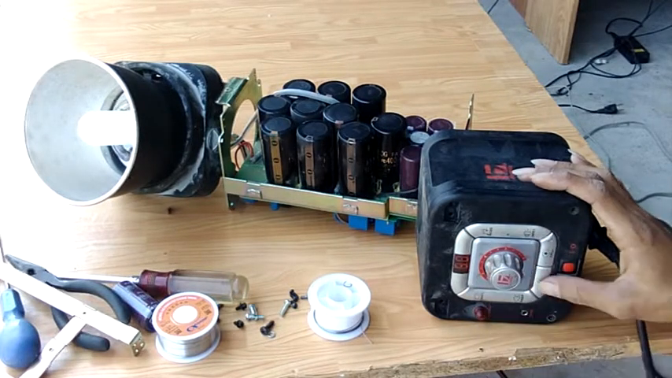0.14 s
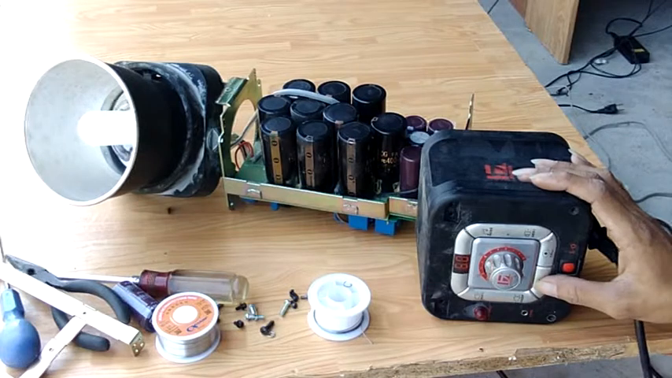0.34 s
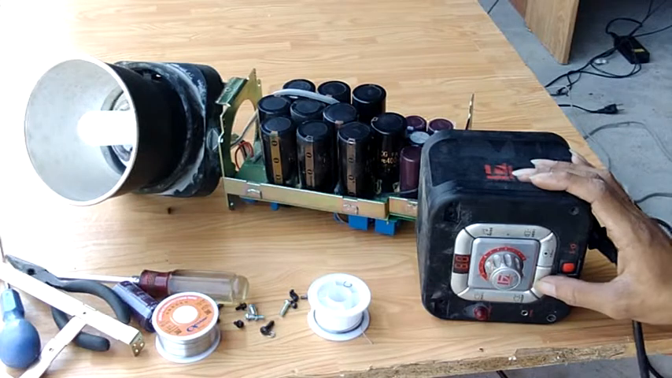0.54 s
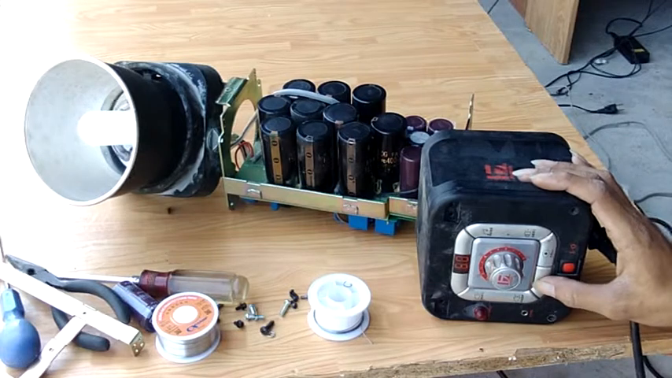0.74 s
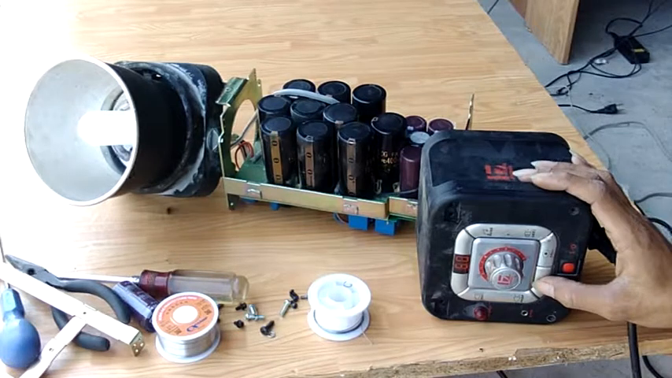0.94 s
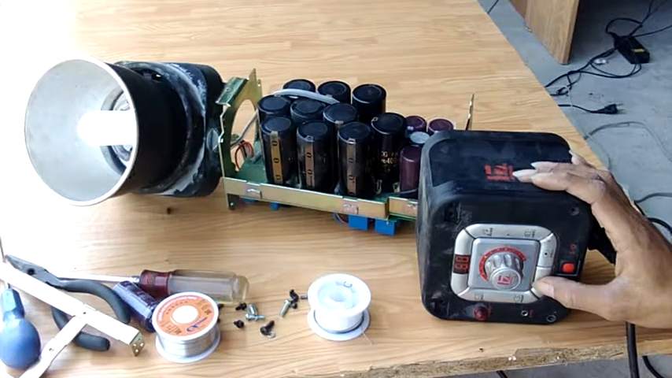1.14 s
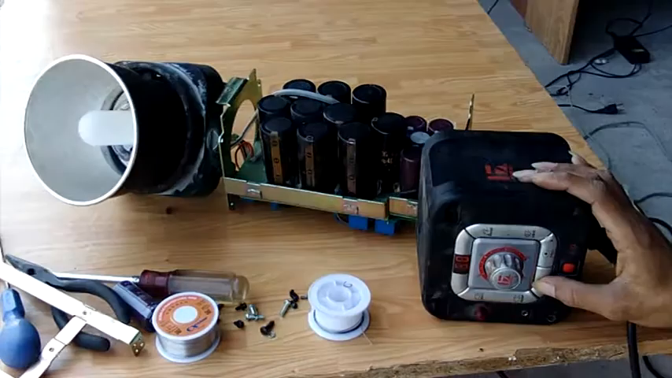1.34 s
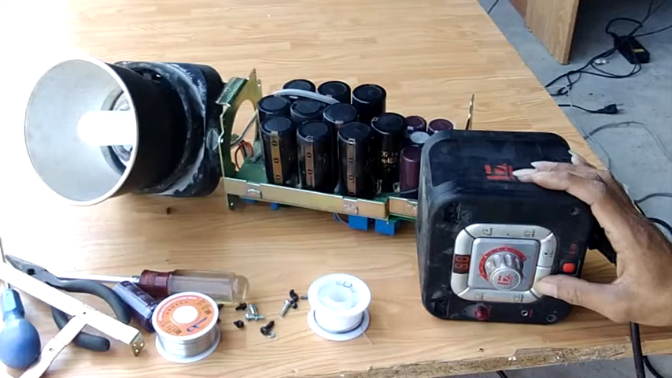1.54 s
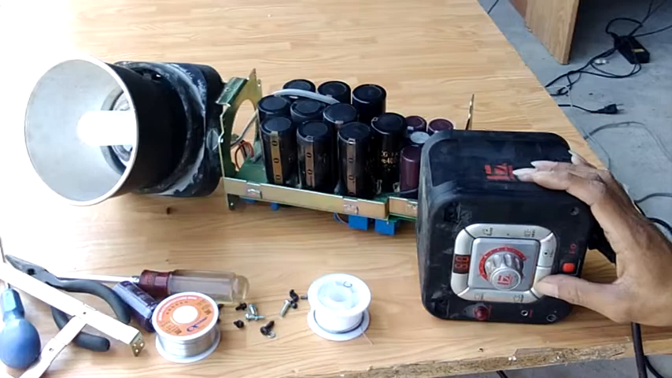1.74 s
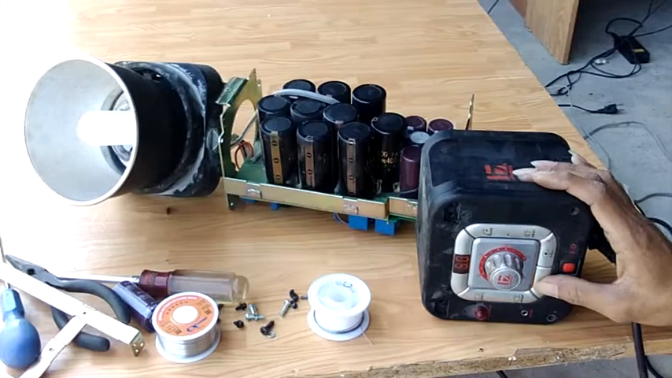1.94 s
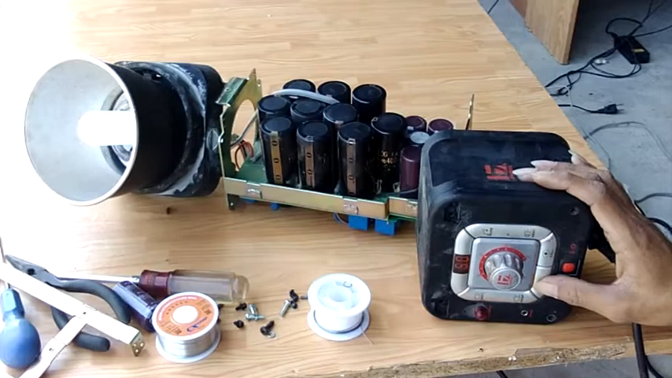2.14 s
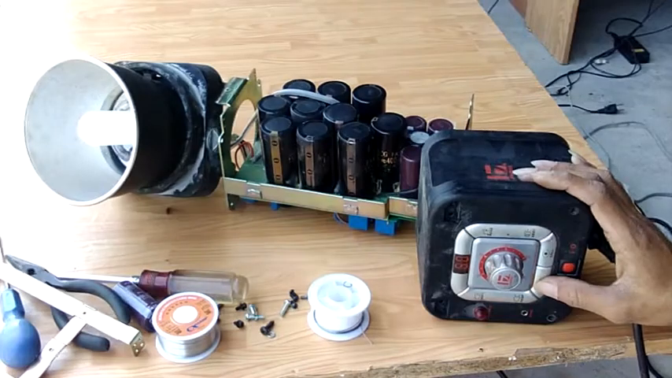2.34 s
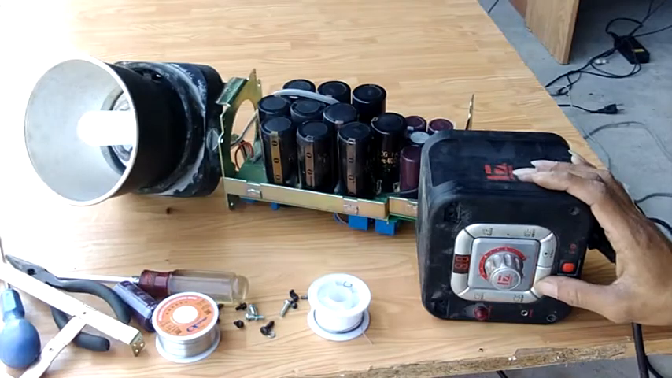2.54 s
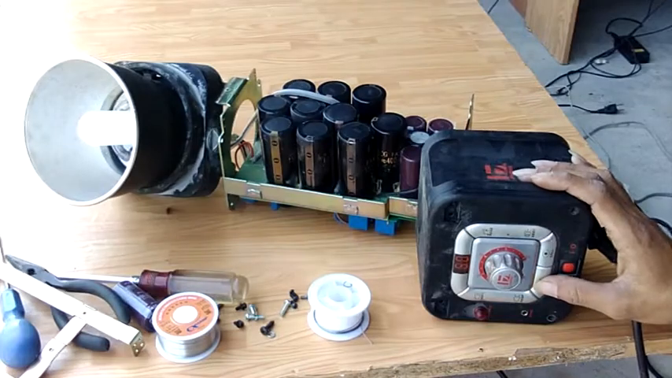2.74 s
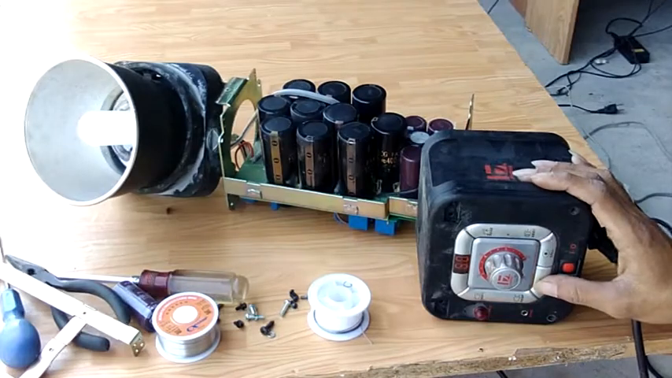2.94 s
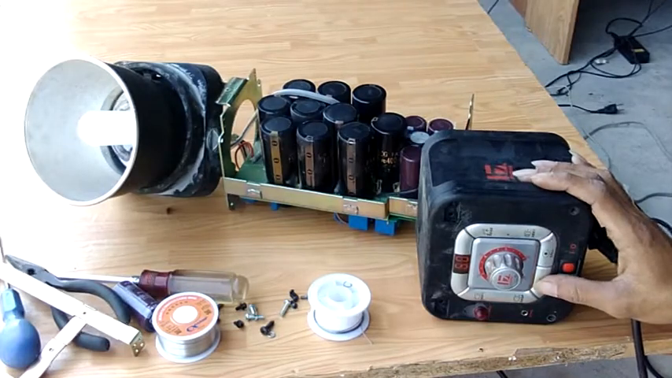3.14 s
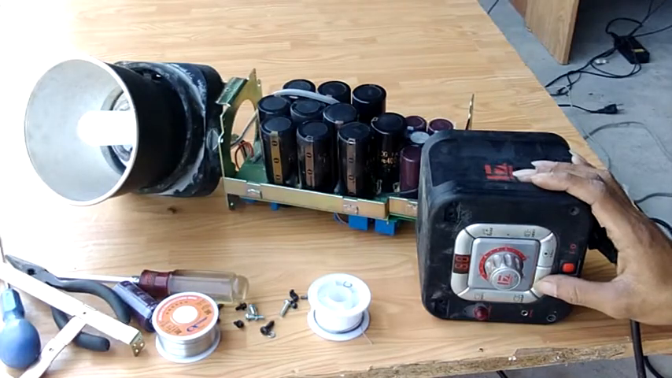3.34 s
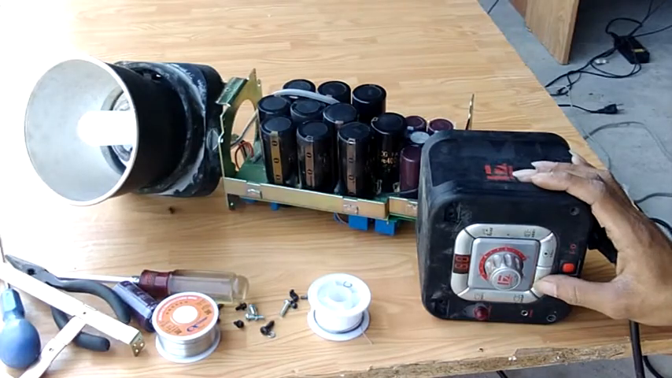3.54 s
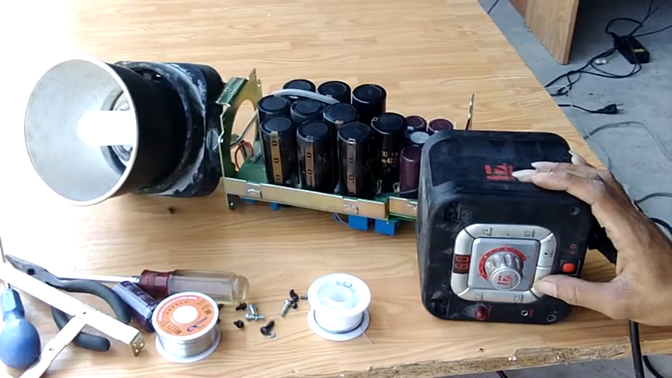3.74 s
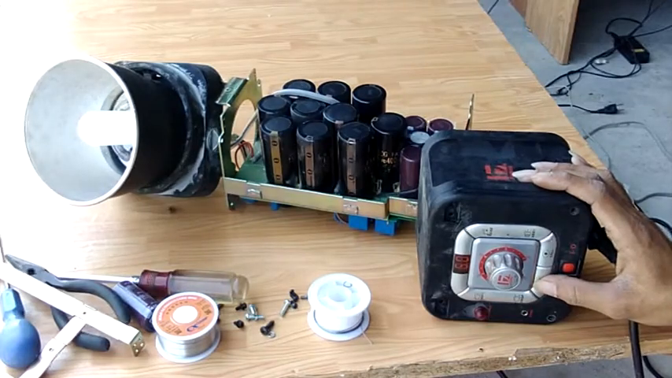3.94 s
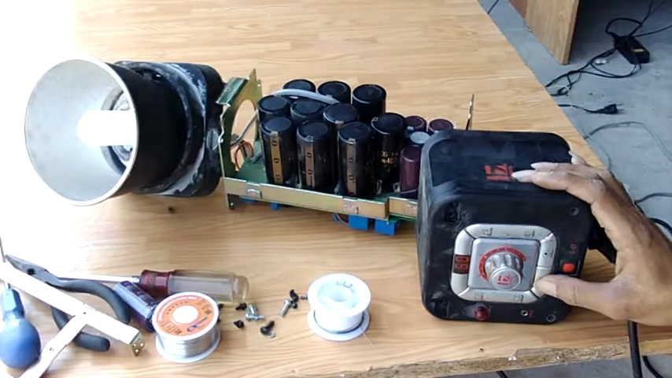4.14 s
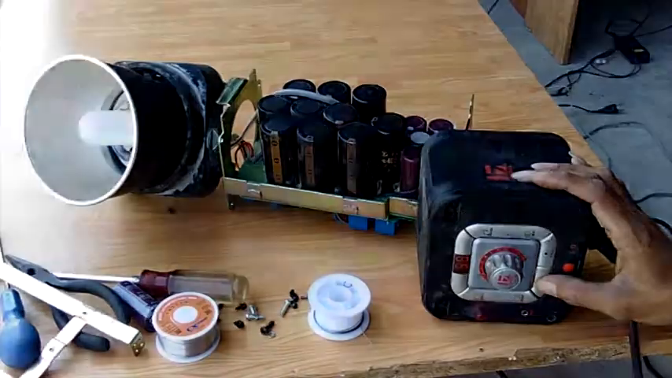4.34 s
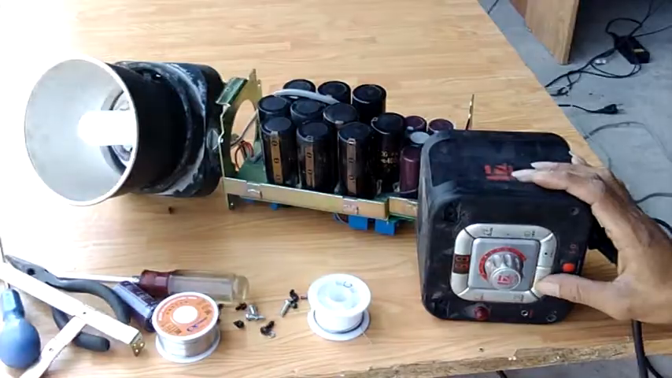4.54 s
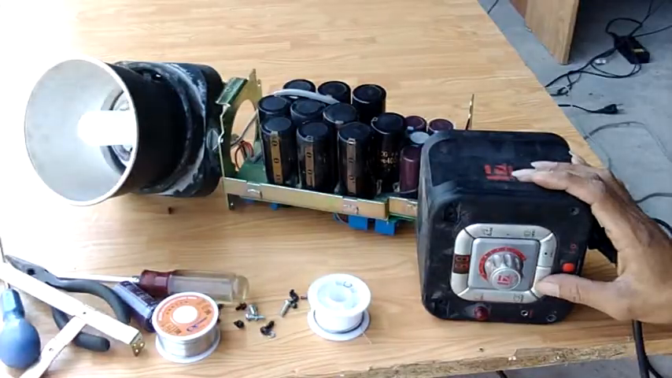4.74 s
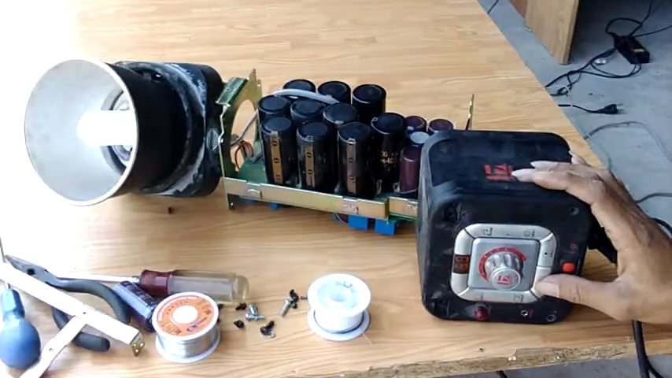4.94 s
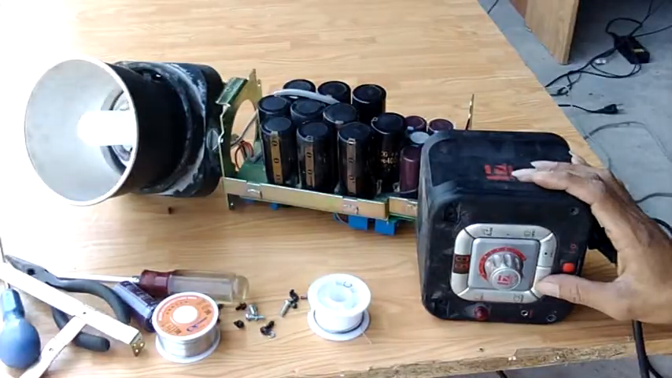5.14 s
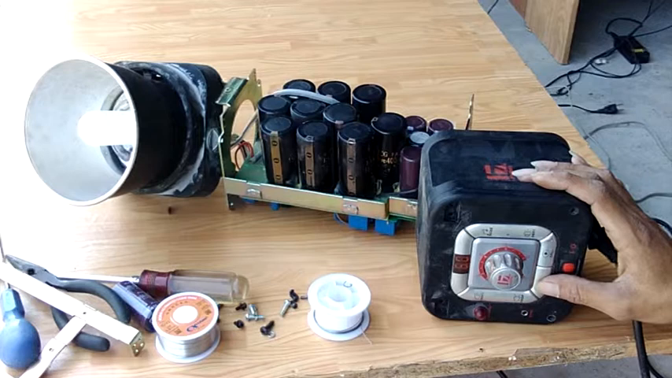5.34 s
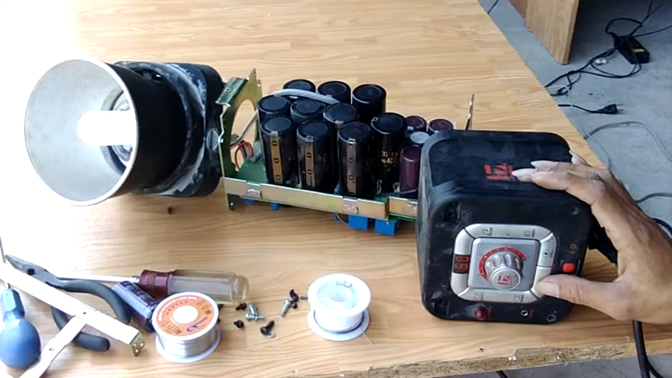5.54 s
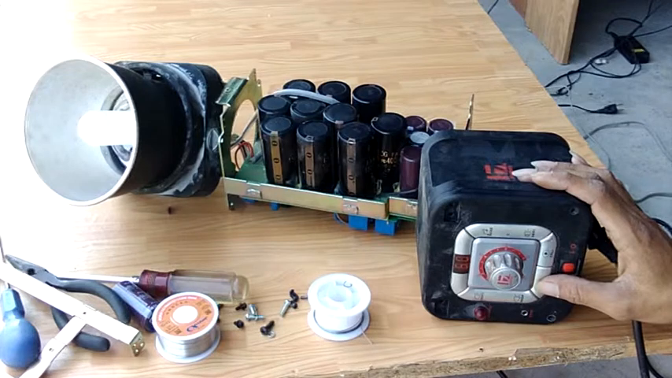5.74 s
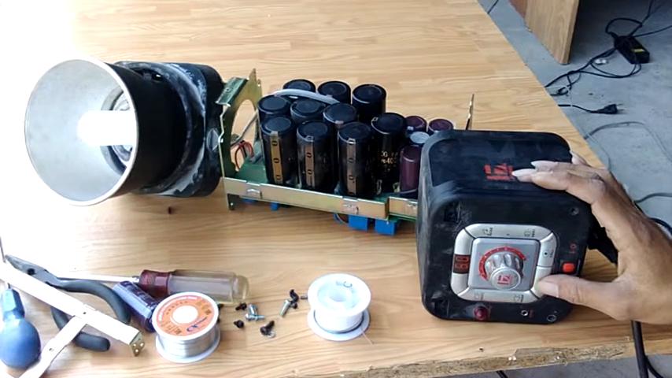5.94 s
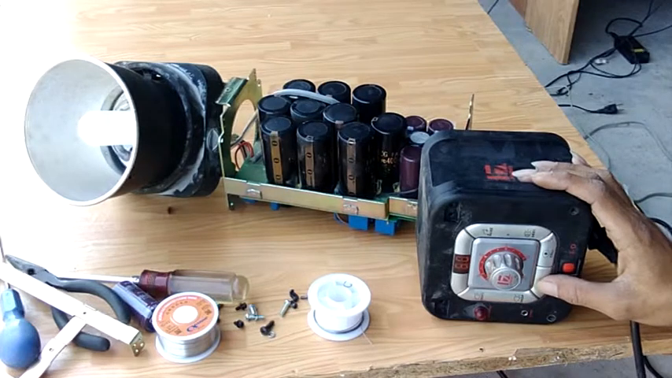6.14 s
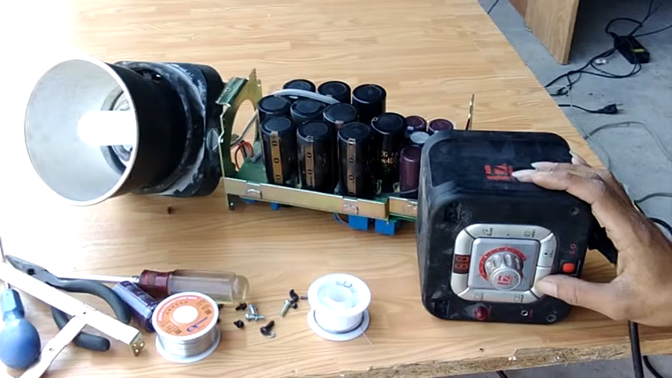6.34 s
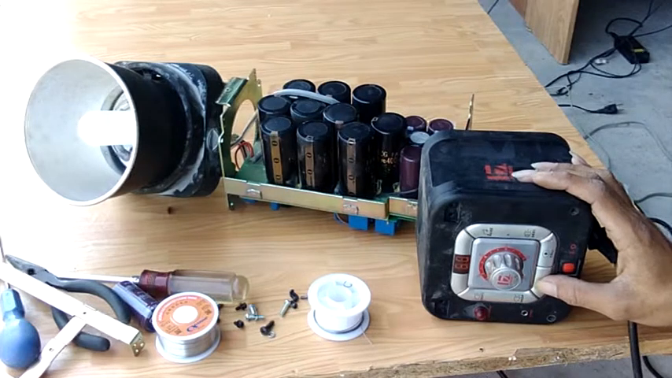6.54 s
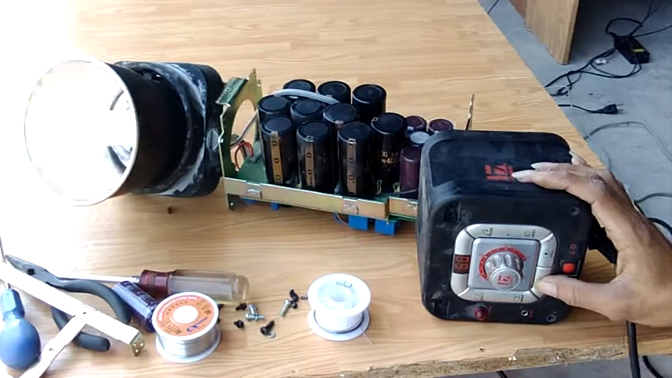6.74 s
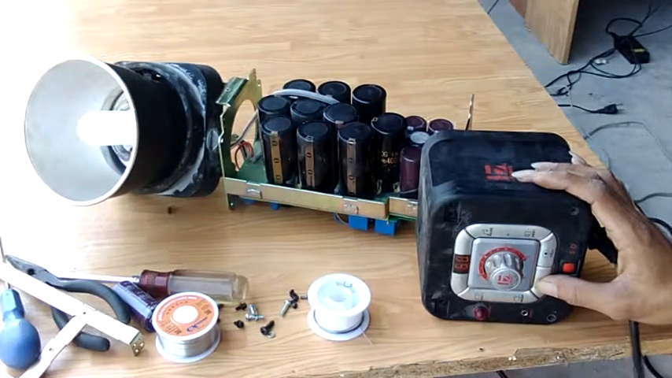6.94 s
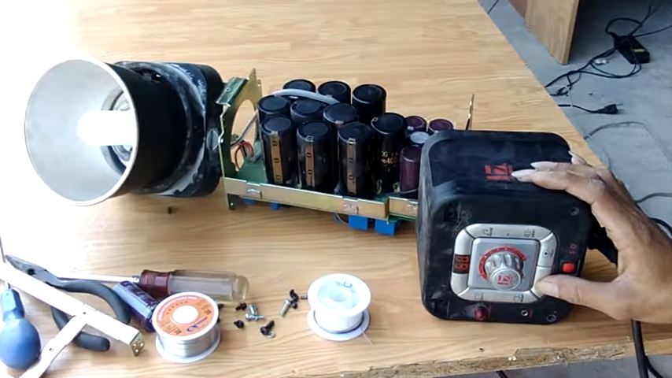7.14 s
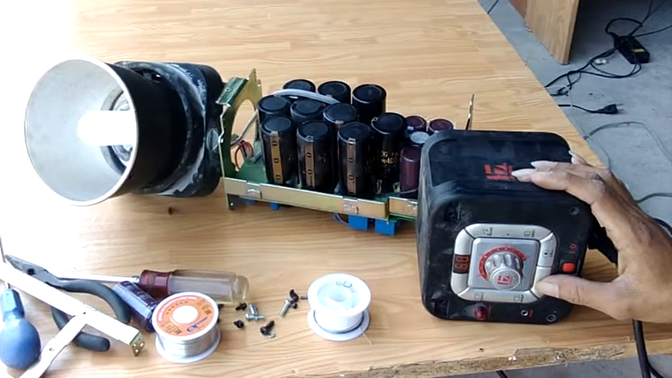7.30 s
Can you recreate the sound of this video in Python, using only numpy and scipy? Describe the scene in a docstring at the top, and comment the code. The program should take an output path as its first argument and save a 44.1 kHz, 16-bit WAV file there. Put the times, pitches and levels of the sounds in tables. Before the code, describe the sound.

Close stereo phone pickup in a bare, live workshop. Over a faint airy drone and distant small birds, a studio flash fires three times, each an abrupt loud pop with metallic reflector ring and short room tail. A plastic button clicks back shortly after each one. Soft bumps and rubs come between the first two pops; a scuff follows the second.

```python
"""An airy drone with faint rustles and small birds outside comes first; soft handling bumps and rubs follow.
A studio flash is test-fired three times on a wooden repair bench, less than a metre from a phone.
Each discharge is one pressure pulse that rings the reflector and the bare workshop; the test button
springs back after it. A thin whine sets in after the second pop, and one scuff follows it.
Noise is filtered for air and friction, damped sines make the knocks, and gliding sines make the birds."""
import sys
import numpy as np
from scipy import signal
from scipy.fft import rfft, irfft
from scipy.io import wavfile
from scipy.ndimage import uniform_filter1d

SR = 44100
rng = np.random.default_rng(int(sys.argv[2]) if len(sys.argv) > 2 else 0)


def unload_wav(signal):
    """Save mono or channel-first audio to the path in sys.argv[1] as 16-bit WAV at rate SR, clipped to [-1, 1]."""
    wavfile.write(
        sys.argv[1],
        SR,
        np.round(np.clip(np.atleast_2d(signal).T, -1, 1) * 32767).astype(np.int16),
    )


N = 329427
TIME = np.arange(N) / SR  # s
FREQ = np.arange(N + 1) * SR / (2 * N)  # Hz, bins of a transform of length 2 N

# broad spectrum of the drone's air noise: frequency_hz, left_db, right_db
AIR_SPECTRUM = [(25.8, -60, -76.5), (54, -38, -39), (86.6, -38, -36.5), (200, -57, -57), (500, -64, -59),
                (712.5, -44, -41.5), (920, -66, -67.5), (1220, -72.5, -68.5), (1466, -52.5, -64.5),
                (1745, -67, -71.5), (1870, -73, -77.5), (2960, -77.5, -81), (9300, -88, -87.5),
                (14000, -86.5, -84)]
# narrow resonances that colour the drone: frequency_hz, width_hz, left_boost_db, right_boost_db
DRONE_RESONANCES = [(430, 70, 6, 2), (650, 39, 7, 2.5), (987, 120, 14, 2), (1310, 50, 0, 8),
                    (1650, 53, -7, 1), (1835, 34, 14, -4.5), (2020, 47, 7, -3.5), (2352, 89, 21.5, -5.5),
                    (2650, 34, 18, 9.5)]

# soft rasping rubs while the hand shifts: peak_s, level_db
RUBS = [(2.61, -61), (3.04, -62.5), (3.509, -61), (4.07, -63.5), (4.55, -73.5), (7.118, -65.5)]
# spectrum of the rubs: frequency_hz, level_db
RUB_SPECTRUM = [(170, -1.5), (350, 7), (650, 9.5), (1100, 1), (1900, -5), (2650, 10), (3300, -21),
                (6000, -17), (12000, -40.5)]
# spectrum of the scuff: frequency_hz, left_db, right_db
SCUFF_SPECTRUM = [(151, -55.5, -52), (353, -45.5, -40.5), (686, -39.5, -40.5), (1270, -47, -46.5),
                  (2470, -50, -57), (3270, -67.5, -69), (7050, -68.5, -79), (11450, -90, -61.5),
                  (14500, -79, -73)]
RUB_RISE_DB_PER_S, RUB_FALL_DB_PER_S = 53, 49.5
SCUFF_START_S, SCUFF_ATTACK_S, SCUFF_HOLD_S, SCUFF_FALL_DB_PER_S = 5.465, 0.064, 0.045, 99

# the charging circuit starts louder by the extra and settles
WHINE_HZ, WHINE_START_S, WHINE_DB, WHINE_EXTRA_DB, WHINE_SETTLE_S = 14002, 4.78, -93.5, 11.5, 0.5

# a small bird's quick double chips: start_s, top_pitch_hz, level_db
BIRD_CHIPS = [(.145, 6550, -74), (.186, 7240, -69), (.62, 7030, -74.5), (.686, 6520, -65),
              (1.538, 6830, -69), (2.511, 6830, -64), (2.972, 6730, -62), (4.61, 6600, -70.5),
              (5.005, 6500, -68), (5.412, 7070, -73), (5.478, 6940, -64.5), (5.87, 6930, -66),
              (6.262, 7510, -70), (6.328, 7000, -68), (6.775, 7420, -55), (6.845, 6870, -52),
              (7.403, 6880, -60)]
# length, one arch of pitch, share by which the pitch dips between arches
CHIP_S, CHIP_ARCH_S, CHIP_DIP = 0.023, 0.01, 0.11
# its falling whistles: start_s, start_pitch_hz, level_db
BIRD_SLURS = [(1.94, 5400, -71.5), (1.97, 4730, -72.5), (2.27, 4900, -79.5), (3.01, 6800, -70),
              (3.46, 7250, -76.5), (3.76, 6900, -76), (3.955, 6880, -67), (4.015, 6480, -62.5),
              (4.07, 4730, -72), (6.885, 7000, -62.5), (6.95, 6350, -63.5), (7.06, 6540, -71.5)]
# length, share of the pitch lost, time constant of the fall
SLUR_S, SLUR_FALL, SLUR_SETTLE_S = 0.071, 0.12, 0.035
# a farther bird's level notes: start_s, pitch_hz, level_db
BIRD_PIPES = [(.25, 3900, -77.5), (1.89, 4850, -72), (2.33, 3800, -76), (2.46, 4100, -81.5),
              (3.36, 4950, -69.5), (4.655, 3900, -70.5), (6.135, 4850, -69.5), (7.19, 3880, -70.5)]
PIPE_S = 0.13

# the firmest handling bumps: start_s, level_db
FIRM_BUMPS = [(2.632, -40), (2.82, -44.5), (2.932, -47), (3.035, -41), (3.384, -43), (3.43, -43),
              (3.518, -36), (3.666, -38.5), (3.958, -48), (4.011, -44), (4.905, -48), (4.984, -45.5),
              (5.122, -48), (6.145, -50.5)]
# weaker bumps at random while the hand fidgets
FIDGETS_PER_S, FIDGET_FROM_S, FIDGET_TO_S, FIDGET_DB = 7, 2.6, 4.15, -52

# tiny sharp ticks: start_s, level_db
SHARP_TICKS = [(.672, -28.5), (0.698, -25), (0.708, -34.5), (7.392, -20.5)]
# faint high rustles: start_s, level_db
RUSTLES = [(0.659, -66), (.93, -78.5), (1.53, -64), (1.815, -71.5), (2.44, -68), (2.51, -68.5),
           (3.17, -73.5), (3.405, -66), (5.269, -72.5), (6.96, -66)]
RUSTLE_S, STRAY_RUSTLES_PER_S, STRAY_RUSTLE_DB = 0.072, 1.3, -77.5

# button releases: start_s, level_db, brightness_db_per_octave
BUTTON_RELEASES = [(1.458, -13, 0), (4.398, -2, 5.5), (6.908, -10.5, -4.5)]
# modes of the plastic case under the button: frequency_hz, level_db, t60_s
CASE_MODES = [(575, -35.5, 0.31), (706, -39, 0.077), (870, -26.5, 0.024), (1203, -29.5, 0.014),
              (1560, -42.5, 0.013), (1900, -39.5, 0.012), (2180, -51, 0.062)]
BOUNCE_S, BOUNCE_DB = 0.0042, -3.5  # the button's second knock

# spectrum of the workshop's answer to a pop: frequency_hz, left_db, right_db
ROOM_SPECTRUM = [(39.8, -14, 12.5), (80, 7.5, 7), (224, 2, 3.5), (380, 10.5, 9), (545, 7.5, 8.5),
                 (895, 14, 15), (1210, 1, 3), (2380, 4, 0.7), (3140, -5, -5), (6410, -4, -9.5),
                 (8800, -13.5, -8.5), (12000, -24.5, -6.5), (14500, -22.5, -24)]
# decay time of the workshop: frequency_hz, t60_s
ROOM_DECAY = [(100, 1.2), (700, 1.037), (2500, 0.87), (6000, 0.76), (13000, 0.58)]

# discharges of the tube: start_s, level_db
DISCHARGES = [(1.2051, -0.5), (4.172, -0.93), (6.6726, -0.95)]
# spectrum of the pop at the two microphones: frequency_hz, left_db, right_db
POP_SPECTRUM = [(49, 4.5, 3), (135, 9, 17), (502.5, 24, 26.5), (746, 23, 28), (960, 17.5, 18),
                (1650, 16.5, 17), (2560, 20.5, 18.5), (3380, 9, 3.5), (4770, 13, 0.5), (6400, 10.5, -15.5),
                (8250, 10, -8), (9500, -4, 4), (12200, -8.5, 2.5), (14200, -12, -8)]
# modes of reflector and housing: frequency_hz, level_db, t60_s
REFLECTOR_MODES = [(764, -13.5, 0.019), (1010, -43.5, 0.29), (1090, -26.5, 0.028), (1386, -22, 0.025),
                   (1810, -32, 0.055), (2655, -25.5, 0.0082), (4283, -29, .016), (5120, -30.5, 0.01),
                   (6720, -27, 0.0091), (7900, -28.5, .012)]
# reflections from nearby surfaces: delay_ms, level_db
SURFACE_ECHOES = [(2.75, -13), (6.6, -34), (12.0, -30.5), (16.0, -20.5), (17.4, -31), (32.0, -32.5)]
HEAT_DB, HEAT_S, TRAVEL_S = -16, 0.0013, 0.002

PORT_LAG_MS, PORT_SPAN_MS = 0.15, 0.4  # travel times between the two microphones
TOP_HZ = 14700


def undb(db):
    """Logarithmic levels: decibels to amplitude gain."""
    return 10 ** (np.asarray(db) / 20)


def unit(x):
    """Normalisation: scale to rms 1."""
    return x / np.sqrt(np.mean(x ** 2))


def colour(rows):
    """Spectral envelope: gain for each dB column, interpolated over log frequency."""
    hz, *columns = np.transpose(rows)
    return undb([np.interp(np.log(FREQ + 1), np.log(hz), column) for column in columns])


def shape(x, response):
    """Linear filtering: multiply the spectrum of a sound by a frequency response."""
    return irfft(rfft(x, 2 * N) * response)[..., :N]


def causal(gain):
    """Minimum phase: the promptest response with these gains, by folding the cepstrum."""
    cepstrum = irfft(np.log(gain))[..., :N] * np.where(TIME > 0, 2, 1)
    return np.exp(rfft(cepstrum, 2 * N))


def delay(ms):
    """Pure delay: a phase that falls linearly with frequency."""
    return np.exp(-2j * np.pi * FREQ * ms / 10 ** 3)


def fade(t, t60):
    """Exponential decay: 60 dB down after t60."""
    return np.exp(-np.log(1000) * t / t60)


def add(out, s, x):
    """Superposition: mix a sound in from time s on."""
    i = int(s * SR)
    out[..., i:i + x.shape[-1]] += x[..., :N - i]


def diffuse():
    """Diffuse field: alike at both microphones in the bass, unrelated in the treble."""
    likeness = np.sinc(2 * FREQ * PORT_SPAN_MS / 10 ** 3)
    mid_side_gains = np.sqrt([(1 + likeness) / 2, (1 - likeness) / 2])
    mid, side = shape(rng.standard_normal((2, N)), mid_side_gains)
    return np.array([mid + side, mid - side])


def ring(modes, tilt_db=0):
    """Modal vibration: damped sines after one blow, tilted in dB per octave about 1 kHz."""
    t = TIME[:SR // 4]
    total = 0
    for hz, db, t60 in modes:
        gain = undb(db + tilt_db * np.log2(hz / 10 ** 3))
        total = total + gain * np.sin(2 * np.pi * hz * t) * fade(t, t60)
    return total


def notes(rows, pitch, warble):
    """Frequency modulation: whistles on one pitch contour and swell, each with an uneven warble."""
    out, swell = np.zeros(N), 2 * np.hanning(len(pitch))
    smoothed = uniform_filter1d(rng.standard_normal(N), size=100)
    wander = unit(uniform_filter1d(smoothed, size=100))
    for s, hz, db in rows:
        track_hz = hz * pitch * (1 + warble * wander[int(s * SR):][:len(pitch)])
        phase = 2 * np.pi * np.cumsum(track_hz) / SR
        add(out, s, undb(db) * swell * np.sin(phase))
    return out


def reverb(build_s=0.0042, hold_s=0.15, hold_width_s=0.033, hold_db=1.0, hold_top_hz=6000):
    """Reverberation: treble dies first, and the tail's level holds up briefly around hold_s before it fades."""
    hz, t, cells = signal.stft(diffuse()[:, :2 * SR], SR, nperseg=512)
    band_hz, band_t60 = np.transpose(ROOM_DECAY)
    t60 = np.interp(np.log(hz + 1), np.log(band_hz), band_t60)
    decay = fade(t, t60[:, None])
    bulge = np.exp(-((t - hold_s) / hold_width_s) ** 2)
    hold = undb(hold_db * bulge / (1 + (hz[:, None] / hold_top_hz) ** 2))
    tail = signal.istft(cells * decay * hold)[1]
    tail = tail * (1 - np.exp(-(TIME[:tail.shape[1]] / build_s) ** 2))
    # mean energy of the two channels is 1
    return rfft(tail / np.sqrt(np.sum(tail ** 2) / 2), 2 * N)


def drone(air_db=-1, apart_db=-5):
    """Resonance: air noise in narrow peaks, plus a draught of its own at each microphone."""
    boost_db = 0
    for hz, width_hz, left_db, right_db in DRONE_RESONANCES:
        peak = 1 / (1 + (2 * (FREQ - hz) / width_hz) ** 2)
        boost_db = boost_db + np.array([[left_db], [right_db]]) * peak
    noise = diffuse() + undb(apart_db) * rng.standard_normal((2, N))
    return shape(noise, colour(AIR_SPECTRUM) * undb(air_db + boost_db))


def rubbing(scuff_db=2.0, grain_db=1.5, rasp_left_db=3, rasp_right_db=-7):
    """Friction noise: soft rubs that swell and fade alike, and one grainy scuff as something slides."""
    grain = unit(uniform_filter1d(rng.standard_normal(N), size=250))
    rub_levels = []
    for s, db in RUBS:
        drop_db = np.maximum(RUB_RISE_DB_PER_S * (s - TIME), RUB_FALL_DB_PER_S * (TIME - s))
        rub_levels.append(undb(db - drop_db))
    rubs = np.max(rub_levels, axis=0)
    rasp = unit(shape(diffuse(), colour(RUB_SPECTRUM))) * rubs * undb([[rasp_left_db], [rasp_right_db]])

    age = TIME - SCUFF_START_S
    fall_age = np.maximum(age - SCUFF_ATTACK_S - SCUFF_HOLD_S, 0)
    slide = np.clip(age / SCUFF_ATTACK_S, 0, 1) * undb(-SCUFF_FALL_DB_PER_S * fall_age)
    grainy = diffuse() * slide * undb(scuff_db + grain_db * grain)
    return rasp + shape(grainy, colour(SCUFF_SPECTRUM))


def flicker(x, depth_db):
    """Amplitude modulation: each narrow band wavers on its own, some ten times a second."""
    cells = signal.stft(x, SR, nperseg=1024)[2]
    field = rng.standard_normal(cells.shape[1:])
    # smooth twice along frequency (axis 0) and twice along time (axis 1)
    for axis in (0, 1, 0, 1):
        field = uniform_filter1d(field, size=3 + 2 * axis, axis=axis)
    gain = unit(undb(depth_db * unit(field)))
    return signal.istft(cells * gain)[1][:, :N]


def whine():
    """Steady oscillation: a high sine from the charging circuit eases off as the capacitors fill."""
    age = np.maximum(TIME - WHINE_START_S, 0)
    level_db = WHINE_DB + WHINE_EXTRA_DB * np.exp(-age / WHINE_SETTLE_S)
    return undb(level_db) * (age > 0) * unit(np.sin(2 * np.pi * WHINE_HZ * TIME))


def birds(direct_db=-4, swell_s=0.021, t60=0.38, left_db=3, right_db=-3):
    """Multipath propagation: chips, slurs and level notes from outside each swell and linger."""
    arches = 1 - CHIP_DIP * (1 - np.abs(np.sin(np.pi * TIME[TIME < CHIP_S] / CHIP_ARCH_S)))
    fall = 1 - SLUR_FALL * (1 - np.exp(-TIME[TIME < SLUR_S] / SLUR_SETTLE_S))
    level = np.ones(int(PIPE_S * SR))
    song = notes(BIRD_CHIPS, arches, warble=0.017)
    song = song + notes(BIRD_SLURS, fall, warble=0.018)
    song = song + notes(BIRD_PIPES, level, warble=0.03)
    paths = rng.standard_normal((2, N)) * fade(TIME, t60) * (1 - np.exp(-TIME / swell_s))
    arrival = undb(direct_db) + rfft(paths / np.linalg.norm(paths[0]), 2 * N)
    return shape(song, arrival) * undb([[left_db], [right_db]])


def bumps(pitch_hz=85, spread=0.08, right_db=1, left_db=-3, lag_ms=1.7, rub_db=-7, rub_hz=160,
          rise_s=0.01):
    """Damped low vibration: handling thuds with some rubbing, reaching the right microphone later."""
    out, t = np.zeros((2, N)), TIME[:SR // 4]
    rise = t / rise_s
    envelope = rise * np.exp(1 - rise)  # peaks at 1 after rise_s
    low_noise = shape(rng.standard_normal((2, N)), 1 / (1 + (FREQ / rub_hz) ** 4))
    rub = undb(rub_db) * unit(low_noise)
    weak_count = int(FIDGETS_PER_S * (FIDGET_TO_S - FIDGET_FROM_S))
    weak = [(s, FIDGET_DB) for s in rng.uniform(FIDGET_FROM_S, FIDGET_TO_S, weak_count)]
    for s, db in FIRM_BUMPS + weak:
        thud_hz = pitch_hz * np.exp(spread * rng.standard_normal())
        thud = np.sin(2 * np.pi * thud_hz * t)
        add(out, s, undb(db) * envelope * (thud + rub[:, int(s * SR):][:, :len(t)]))
    return shape(out, np.array([undb(left_db) * delay(0), undb(right_db) * delay(lag_ms)]))


def ticks(room, tick_db=-19, t60=0.0096, rustle_db=0, grain_db=5.5, low_hz=8500, top_hz=13500,
          room_db=-3, left_db=-10, right_db=1):
    """Band-limited noise: bright ticks and grainy rustles by the hand on the right, with stray ones."""
    out, t = np.zeros((2, N)), TIME[:SR // 20]
    for s, db in SHARP_TICKS:
        add(out, s, undb(db + tick_db) * rng.standard_normal((2, len(t))) * fade(t, t60))
    grain = unit(uniform_filter1d(rng.standard_normal(N), size=120))
    grains = undb(grain_db * grain) * rng.standard_normal((2, N))
    stray_times = rng.uniform(0, TIME[-1], int(STRAY_RUSTLES_PER_S * N / SR))
    strays = [(s, STRAY_RUSTLE_DB) for s in stray_times]
    swells, progress = np.zeros(N), np.linspace(0, 1, int(RUSTLE_S * SR))
    for s, db in RUSTLES + strays:
        add(swells, s, undb(db + rustle_db) * np.sin(np.pi * progress ** 0.6))
    band = 1 / (1 + (low_hz / (FREQ + 1)) ** 4) / (1 + (FREQ / top_hz) ** 10)
    heard = shape(out + swells * grains, (1 + undb(room_db) * room) * band)
    return heard * undb([[left_db], [right_db]])


def button(room, snap_db=-39, snap_t60=0.0069, snap_hz=3500, room_db=-13):
    """Impact excitation: the button springs back with a dull snap and knocks the plastic case twice."""
    out, t = np.zeros(N), TIME[:SR // 4]
    for s, db, tilt_db in BUTTON_RELEASES:
        for after_s, knock_db in ((0, 0), (BOUNCE_S, BOUNCE_DB)):
            # the snap takes the tilt of two octaves above 1 kHz
            snap = undb(snap_db + 2 * tilt_db) * rng.standard_normal(len(t)) * fade(t, snap_t60)
            add(out, s + after_s, undb(db + knock_db) * (ring(CASE_MODES, tilt_db) + snap))
    return shape(out, (1 + undb(room_db) * room) / (1 + 1j * FREQ / snap_hz))


def flashes(room, pop_db=-2, ring_db=-3, room_db=0, crack_db=1, crack_t60=0.013, crack_hz=9000,
            echo_hz=2500, heat_left_db=-14):
    """Impulse response: expanding gas sends one pulse through reflector, nearby surfaces and room."""
    sparks, heat = np.zeros(N), np.zeros(N)
    age = TIME[:SR // 20] / HEAT_S
    heat_pulse = age * (1 - age / 2) * np.exp(1 - age)
    for s, db in DISCHARGES:
        add(sparks, s, -undb([db]))
        # the light heats things by the phone before the sound arrives
        add(heat, s - TRAVEL_S, -undb(db + HEAT_DB) * heat_pulse)

    # quick bounces inside the reflector spread the treble into a crack
    bounces = rng.standard_normal(SR // 20) * fade(TIME[:SR // 20], crack_t60)
    treble = 1j * FREQ / (crack_hz + 1j * FREQ)
    crack = undb(crack_db) * rfft(bounces / np.linalg.norm(bounces), 2 * N) * treble
    pop = undb(pop_db) * causal(colour(POP_SPECTRUM)) * (1 + crack)
    direct = pop + undb(ring_db) * rfft(ring(REFLECTOR_MODES), 2 * N)
    # the lamp stands to the left, so the right microphone hears it later
    direct = direct * np.array([delay(0), delay(PORT_LAG_MS)])

    # cluttered surfaces send back dull echoes
    echoes = sum(undb(db) * delay(ms) for ms, db in SURFACE_ECHOES)
    surfaces = 1 + echoes / (1 + 1j * FREQ / echo_hz)
    tail = undb(room_db) * causal(colour(ROOM_SPECTRUM)) * room
    return shape(sparks, direct * surfaces + tail) + heat * undb([[heat_left_db], [0]])


def scene():
    """Superposition: pops, button and ticks share one room; the drone and rubbing flicker softly."""
    room = reverb()
    background = flicker(drone() + rubbing(), depth_db=3.8)
    handling = bumps() + ticks(room) + button(room)
    return background + whine() + birds() + handling + flashes(room)


def record(dry, ceiling=1.0, low_hz=48):
    """Soft saturation and band limits: the phone rounds the pops' peaks, cuts lowest bass and top."""
    saturated = ceiling * np.tanh(dry / ceiling)
    rounded = shape(saturated, 1 / (1 + (low_hz / (FREQ + 1)) ** 4))
    lowpass = signal.ellip(8, 0.2, 70, TOP_HZ, fs=SR, output="sos")
    return signal.sosfilt(lowpass, rounded)


dry = scene()
out = record(dry)
unload_wav(out)
```